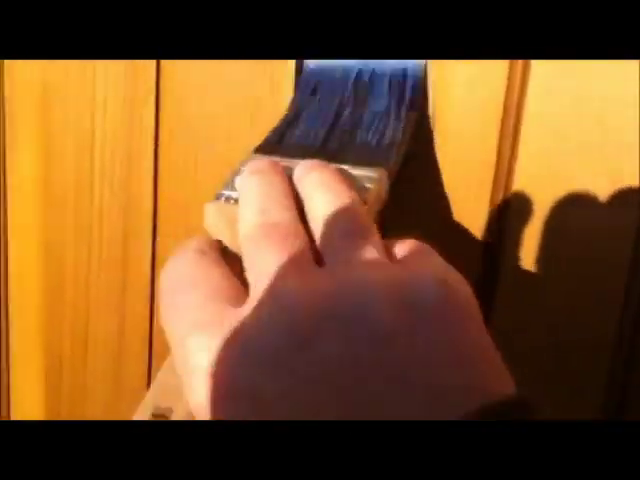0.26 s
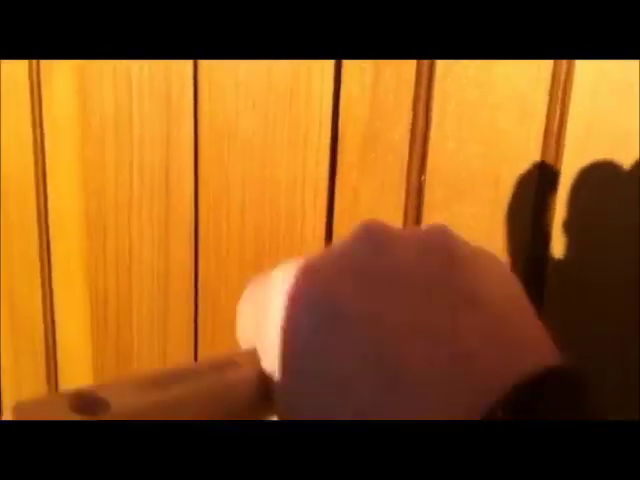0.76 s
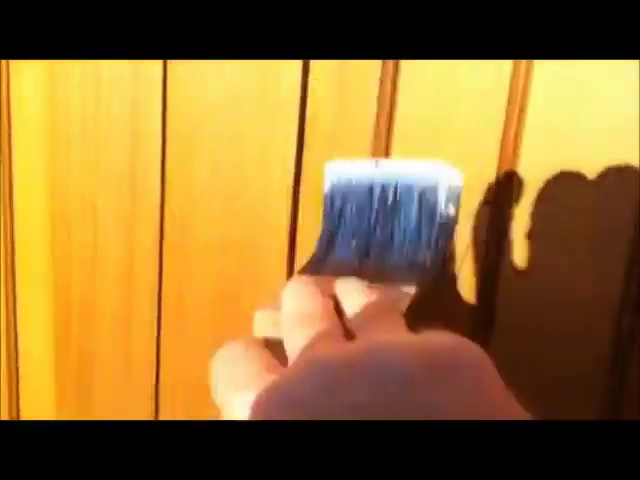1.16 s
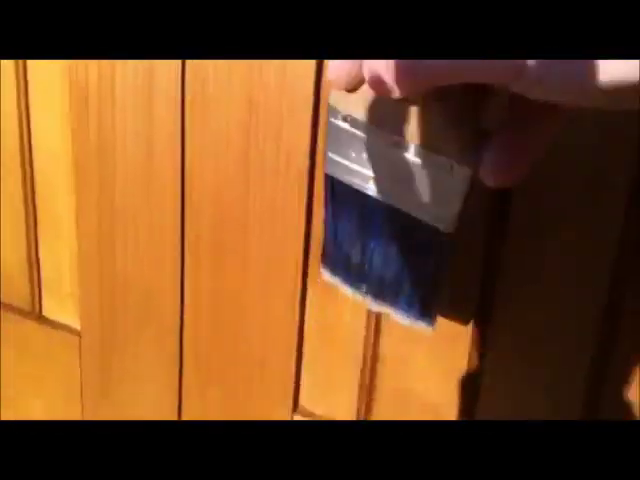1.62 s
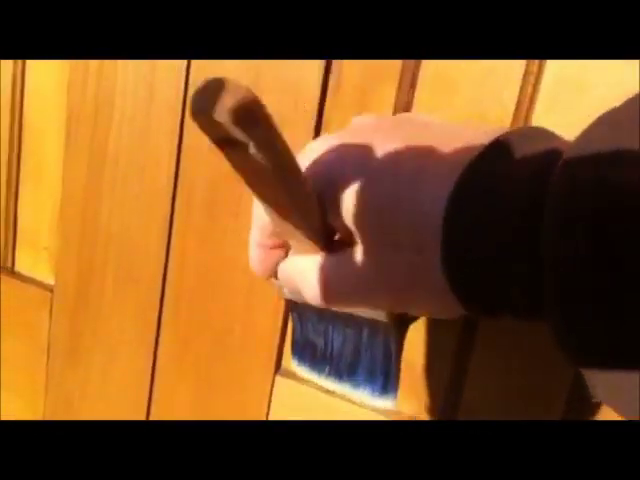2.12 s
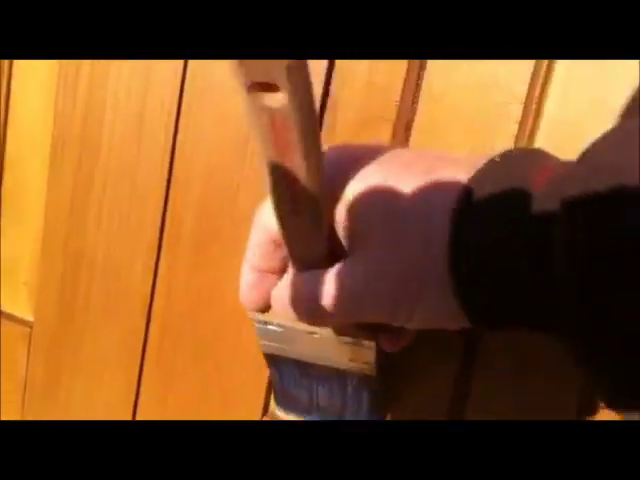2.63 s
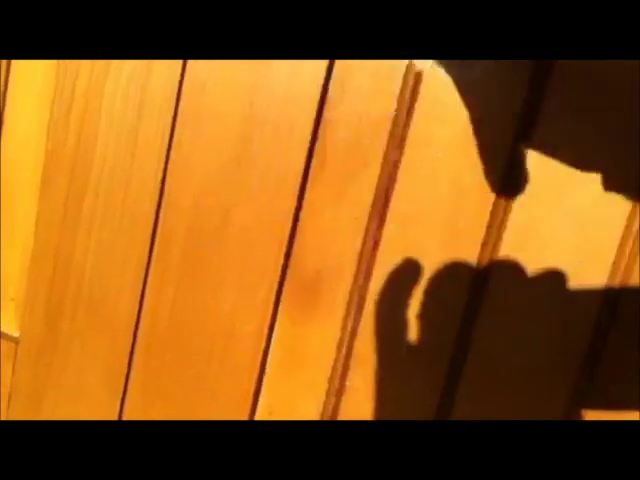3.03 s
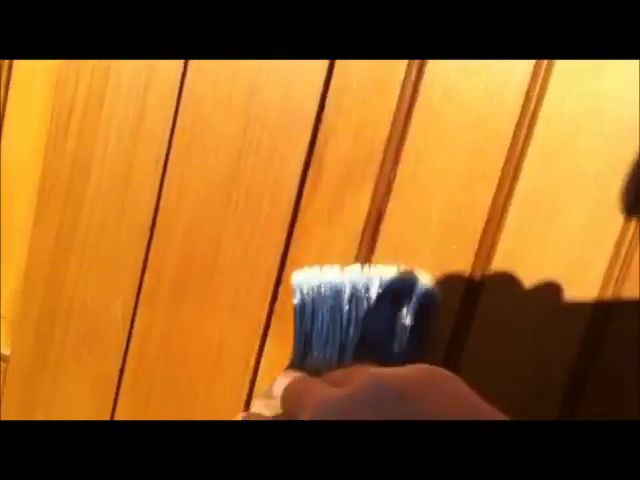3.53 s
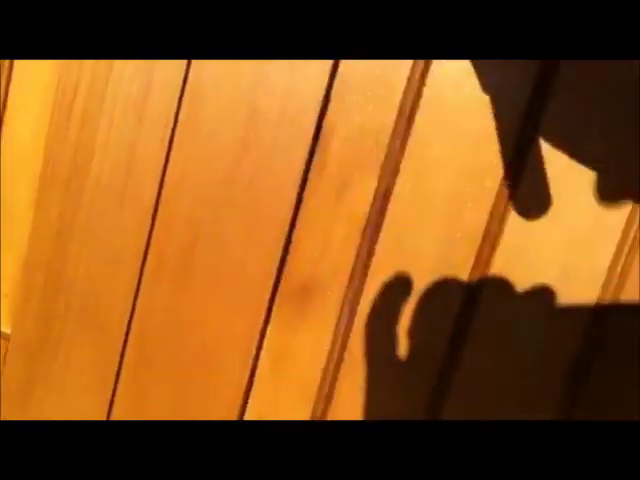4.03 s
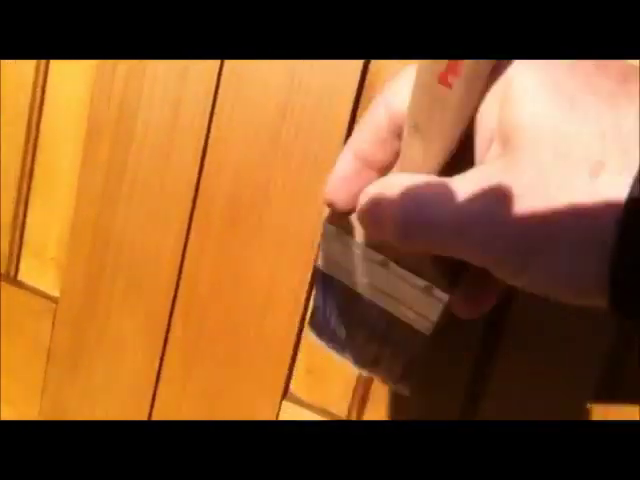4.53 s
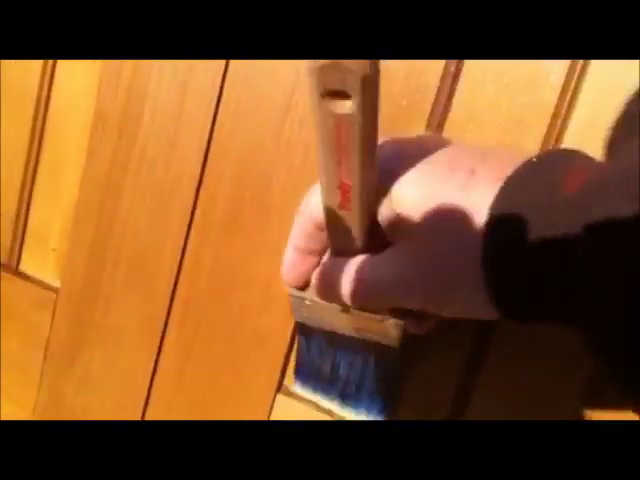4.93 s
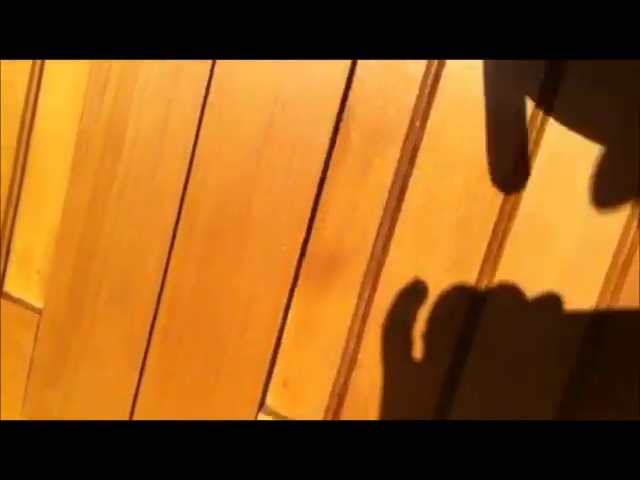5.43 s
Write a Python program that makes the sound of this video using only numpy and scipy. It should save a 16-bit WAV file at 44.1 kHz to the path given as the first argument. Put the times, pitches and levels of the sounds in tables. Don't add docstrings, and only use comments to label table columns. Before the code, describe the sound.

Bristles scrape softly along wood grain, bright and hissy with a hollow midrange rasp and slight low board tone. Firm strokes give way to a small hard click, light dabbing with muffled knocks, then a steady run of long sweeps to the end. Recorded close in mono, outdoors, without echo, over very quiet air noise.

```python
import sys
import numpy as np
from scipy import signal
from scipy.fft import rfft, irfft, next_fast_len
from scipy.io import wavfile
from scipy.ndimage import uniform_filter1d, map_coordinates

SR = 44100
rng = np.random.default_rng(int(sys.argv[2]) if len(sys.argv) > 2 else 0)


def inscribe(sig):
    pcm = np.round(np.clip(np.atleast_2d(sig).T, -1, 1) * 32767)
    wavfile.write(sys.argv[1], SR, pcm.astype(np.int16))


def gain_from_db(level_db):
    decades = np.asarray(level_db, float) / 20
    return 10 ** decades


N = 249606

# (frequency [Hz], density [dB per Hz])
RUMBLE_SPECTRUM = [(15, -10), (30, -20), (55, -30), (85, -20), (125, -9), (160, -1), (200, -6), (330, -9),
                   (550, -18), (900, -60), (1500, -120)]
# (time [s], level [dB])
RUMBLE_LEVEL = [(0, -72), (1.3, -73), (1.6, -70), (2.2, -71), (2.7, -72), (2.9, -66), (3.3, -71),
                (4.7, -71), (5.15, -68), (5.66, -68)]
# (frequency [Hz], density [dB per Hz])
HISS_SPECTRUM = [(20, -2), (35, -10), (60, -22), (300, -12), (600, -3), (1200, -4), (1550, -9), (2050, -4),
                 (3000, -11), (6000, -11), (16000, -13)]
# (time [s], peak [dB], frequency [Hz], t60 [s])
LANDINGS = [(.375, -44.5, 1555, 0.064), (0.384, -53, 200, .06), (0.809, -51, 222, 0.11),
            (2.052, -38, 1790, 0.033), (2.081, -49, 300, 0.054), (2.694, -44, 390, 0.043),
            (2.71, -43, 595, 0.17), (2.721, -35.5, 388, 0.034), (2.722, -38.5, 180, 0.067),
            (2.746, -35.5, 179, 0.044), (2.775, -50, 177, 0.074), (2.82, -47, 160, 0.036),
            (2.852, -50, 285, 0.069), (3.114, -48.5, 154, 0.12), (3.795, -46, 268, 0.063),
            (4.945, -41, 1770, 0.057)]
# (time [s], peak [dB])
TICKS = [
    (1.8149, -28),
]
# (frequency [Hz], level [dB], t60 [s], rise [s])
HANDLE_MODES = [(1300, -7, .006, .0006), (3300, -1.5, .004, .0004), (4700, -14, .003, .0002),
                (8800, -15, .0015, .00005), (7600, -17, .004, .0001), (6000, 0, .0006, .00001),
                (11500, -3, .0005, .00001)]
# (touch [s], speeding up [s], running out [s], top tip hiss [dB], sag before lift [dB])
STROKES = [(-.1, 0.076, 0.053, -42.5, 7), (0.371, 0.012, 0.022, -59, 1), (0.387, 0.14, 0.2, -38, 9),
           (.807, .02, .05, -47, 0), (.81, 0.13, 0.088, -40.5, 7), (1.19, 0.12, 0.16, -41.5, 8),
           (2.046, .012, 0.09, -50, 10.5), (2.15, 0.053, 0.055, -60.5, 11), (2.261, 0.042, .02, -55.5, 0),
           (2.29, 0.084, 0.055, -45.5, 9.5), (2.689, .008, 0.019, -45.5, -4),
           (2.735, 0.038, 0.097, -60, 19), (2.84, 0.038, 0.058, -55, -5), (2.87, 0.17, 0.21, -42, 6),
           (3.41, 0.17, 0.11, -40, 6.5), (1.198, .008, .02, -55, 3), (3.88, 0.14, 0.18, -41.5, 10),
           (4.245, 0.022, 0.022, -62.5, -4), (4.29, 0.12, 0.12, -40.5, 5),
           (4.933, 0.017, 0.072, -48.5, 10.5), (5.059, 0.074, 0.056, -60.5, 9),
           (5.17, 0.032, 0.087, -62, 6.5), (5.282, .08, 0.039, -45.5, -0.5), (5.33, 0.13, 0.23, -42.5, 6.5)]
# (start [s], speeding up [s], running out [s], top tip hiss
# [dB], sag [dB])
FLICKS = [
    (3.2, .07, .04, -46, 2),
    (3.66, .09, .045, -43, 4),
    (4.5, .04, .02, -49, 2),
    (.66, .045, .028, -47, 3),
    (.99, .045, .04, -45, 5),
    (5.025, .02, .05, -63, 0),
    (2.42, .035, .015, -58, 1),
    (1.42, .07, .032, -44.5, 4),
]
# (frequency [Hz], density [dB per Hz])
TIP_SPECTRUM = [(1500, -29), (4500, -7), (6000, -1.5), (6800, -2), (9000, 0.5), (11700, 0.5), (15100, -1),
                (16000, -10.5)]
# (frequency [Hz], density [dB per Hz])
SHAFT_SPECTRUM = [(1200, -24), (2400, -1), (3000, -4), (4000, 0), (5400, -2), (6500, -12), (9000, -36)]
# (frequency [Hz], density [dB per Hz])
BOARD_SPECTRUM = [(90, -31), (165, -42), (250, -4), (450, -1.5), (590, 2), (750, 0), (1100, -4.5),
                  (1500, -10.5), (3000, -52)]
# (level re tips in a firm stroke [dB], gain per slowing [dB/dB], gain per lean [dB/dB])
PARTS = [(-5, 0.2165, .5), (-8, 0.2874, 0.82), (-17, 0.78, 1.1)]
THINNING_DB = (0, 1.5, -0.5)
# (time [s], lean [dB])
LEAN = [(0, -5.5), (.5, 1.5), (.68, -4.5), (.85, -8.5), (1.1, -9.5), (1.35, -1), (1.52, -3.5), (2.1, -0.5),
        (2.3, 2), (2.47, -8), (2.9, 2.5), (3.3, -6), (3.5, -5), (4.1, -3.5), (4.35, -5), (4.6, -5),
        (5.3, 3), (5.66, -5)]
# (time [s], bend [dB], duration [s], ridge frequency [Hz])
BENDS = [(.375, 4, 0.014, 1580), (.56, 6.5, 0.072, 1950), (.94, 10, 0.063, 1880), (1.33, 3, 0.053, 1910),
         (2.08, 6.5, 0.055, 1880), (2.36, 5.5, 0.067, 2000), (2.715, 9, 0.024, 1780),
         (3.17, 7.5, 0.049, 1730), (3.58, 7, .07, 1780), (4.08, 8, 0.09, 1860), (4.43, 8.5, 0.046, 1860),
         (4.95, 6.5, 0.044, 1810), (5.59, 8.5, 0.053, 1780), (5.45, 2.5, 0.054, 1830),
         (.86, 3.5, 0.033, 2070), (3.02, 1, 0.097, 1900), (3.27, 3, .03, 1820), (4.16, -2.5, .03, 1780)]

FIRM_DB = -41
REST_HZ = 1940
BOARD_RISE_RATIO = 1.16
SHAFT_LOSS_PER_BEND, RIDGE_GAIN_PER_BEND = 0.14, 0.1
TOUCH_POWER, EASE_POWER, SAG_POWER = 1.25, 1.33, 1.96
LIFT_DB_PER_S = 540


def unit(x):
    return x / np.sqrt(np.mean(np.abs(x) ** 2) + 1e-20)


def along(points, hz):
    f, v = np.transpose(points)
    return np.interp(np.log(hz + 1), np.log(f + 1), v)


def wobble(knots_per_s):
    count = int(N * knots_per_s / SR) + 4
    return map_coordinates(rng.standard_normal(count), [np.arange(N) * knots_per_s / SR])


def coloured(spectrum):
    m = next_fast_len(N)
    gain = gain_from_db(along(spectrum, np.fft.rfftfreq(m, 1 / SR)))
    return unit(irfft(rfft(rng.standard_normal(m)) * gain, m)[:N])


def air():
    s, db = np.transpose(RUMBLE_LEVEL)
    level_db = np.interp(np.arange(N) / SR, s, db) + 0.7 + 2 * wobble(3.1)
    rumble = gain_from_db(level_db) * coloured(RUMBLE_SPECTRUM)
    hiss = gain_from_db(-65.3) * coloured(HISS_SPECTRUM)
    return rumble + hiss


def handle_tick():
    out, t = np.zeros(N + SR), np.arange(SR // 4) / SR
    for s, peak_db in TICKS:
        ring = np.zeros(len(t))
        for hz, db, t60, rise_s in HANDLE_MODES:
            ring += gain_from_db(db - 60 * t / t60) * (1 - np.exp(-t / rise_s)) * np.sin(2 * np.pi * hz * t)
        start = round(s * SR)
        out[start:start + len(t)] += gain_from_db(peak_db) * ring
    return out[:N]


def landings():
    out, t = np.zeros(N + SR), np.arange(SR // 4) / SR
    onset = 1 - np.exp(-t / 0.0016)
    for s, peak_db, hz, t60 in LANDINGS:
        thump = np.sin(2 * np.pi * hz * t)
        if hz < 400:
            thump += 0.5 * np.sin(2 * np.pi * 2.32 * hz * t) * gain_from_db(-60 * t / t60)
        start = round(s * SR)
        out[start:start + len(t)] += gain_from_db(peak_db - 60 * t / t60) * onset * thump
    return out[:N]


def stroke_speed():
    t = np.arange(N) / SR
    power, progress = np.full(N, 1e-12), np.zeros(N)
    for k, (s, rise_s, run_s, top_db, sag_db) in enumerate(STROKES + FLICKS):
        up = np.clip((t - s) / rise_s, 0, 1)
        out = np.clip((t - s - rise_s) / run_s, 0, 1)
        gone_db = LIFT_DB_PER_S * np.clip(t - s - rise_s - run_s, 0, 1)
        easing = 1 - (1 - up ** TOUCH_POWER) ** EASE_POWER
        stroke = (easing * gain_from_db(top_db - sag_db * out ** SAG_POWER - gone_db)) ** 2
        is_flick = k >= len(STROKES)
        done = 1 if is_flick else np.clip((t - s) / (rise_s + run_s), 0, 1)
        power += stroke
        progress += stroke * done
    return 10 * np.log10(power), progress / power


def slips(spiky_db, clump_db):
    size = gain_from_db(spiky_db * rng.exponential(size=N) + clump_db * wobble(180))
    return unit(size * rng.standard_normal(N))


def resonance(f, centre_hz, width_hz):
    return 1 / (1 + ((f * f - centre_hz ** 2) / (f * width_hz)) ** 2)


def pack_bend(frames):
    s, bend_db, duration_s, bent_hz = np.transpose(BENDS)[:, :, None]
    bend = np.exp(-0.5 * ((frames - s) / duration_s) ** 2)
    return (bend * bend_db).sum(axis=0), REST_HZ + (bend * (bent_hz - REST_HZ)).sum(axis=0)


def brush():
    tip_db, progress = stroke_speed()
    pressure = gain_from_db(tip_db + 0.35 * wobble(30))
    bristles = slips(spiky_db=1.2, clump_db=0.5)
    hz, frames, z = signal.stft(pressure * bristles, SR, nperseg=512, noverlap=384)

    t = np.arange(N) / SR
    slowing_db = np.clip(FIRM_DB - np.interp(frames, t, tip_db), -10, 25)
    done = np.interp(frames, t, progress)
    lean_db = np.interp(frames, *np.transpose(LEAN))
    levels_db = []
    for (db, slow, lean), thin_db in zip(PARTS, THINNING_DB):
        levels_db.append(db + slow * slowing_db + lean * lean_db + thin_db * (done - 0.5))
    shaft_db, pack_db, board_db = levels_db
    bent_db, pack_hz = pack_bend(frames)
    pack_db = pack_db + bent_db
    shaft_db = shaft_db - SHAFT_LOSS_PER_BEND * bent_db

    f = hz[:, None] + 1
    tips = unit(gain_from_db(along(TIP_SPECTRUM, f))) ** 2
    shafts = unit(gain_from_db(along(SHAFT_SPECTRUM, f))) ** 2
    board = unit(gain_from_db(along(BOARD_SPECTRUM, f / BOARD_RISE_RATIO ** (done - 0.5)))) ** 2
    hump = 9 * resonance(f, 0.86 * pack_hz, width_hz=3280) ** 3
    ridge = gain_from_db(0.8 * pack_db + 5) * resonance(f, pack_hz, width_hz=340) ** 2
    pack = hump + 14 * gain_from_db(2 * RIDGE_GAIN_PER_BEND * bent_db) * ridge
    power = 1.72 * tips + gain_from_db(2 * shaft_db) * 1.62 * shafts
    power = power + gain_from_db(2 * pack_db) * pack + gain_from_db(2 * board_db) * 1.36 * board

    field = uniform_filter1d(rng.standard_normal(z.shape), size=4, axis=0)
    field = uniform_filter1d(field, size=18, axis=1)
    depth_db = along([(500, 2.5), (2500, 2), (5000, 1.2)], f)
    z = z * np.sqrt(power) * gain_from_db(depth_db * unit(field))
    return signal.istft(z, SR, nperseg=512, noverlap=384)[1][:N]


def scene():
    mono = air() + handle_tick() + landings() + brush()
    return np.array([mono, mono])


def low_pass(x):
    return signal.sosfilt(signal.butter(12, 17020, fs=SR, output="sos"), x)


def record(dry):
    mic = signal.sosfilt(signal.butter(1, 60, "high", fs=SR, output="sos"), dry)
    return low_pass(mic)


dry = scene()
out = record(dry)
inscribe(out)
```